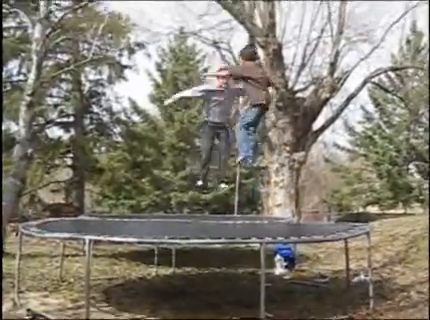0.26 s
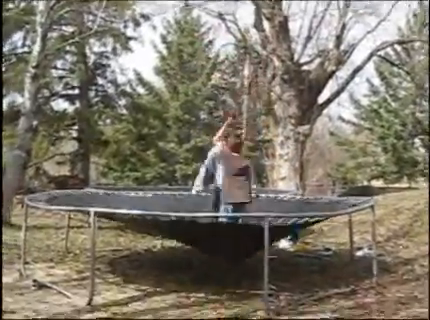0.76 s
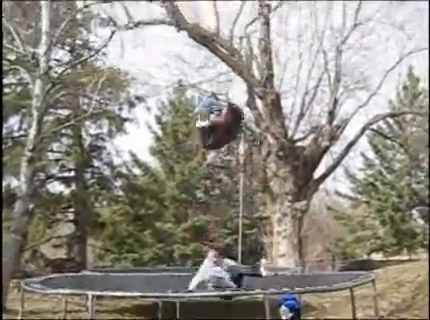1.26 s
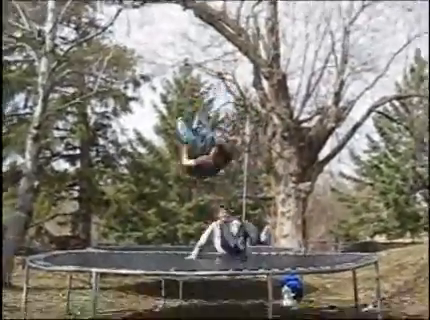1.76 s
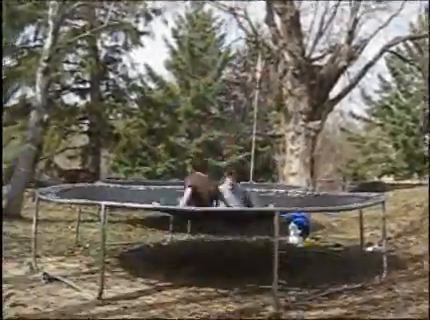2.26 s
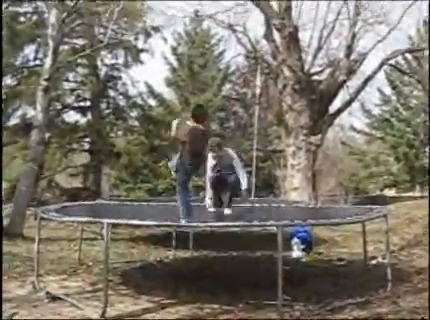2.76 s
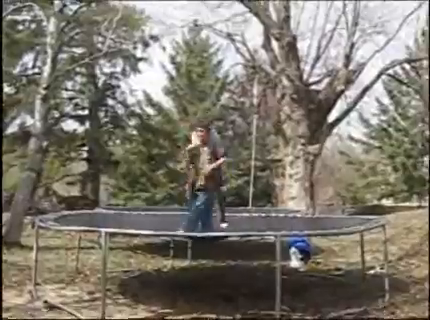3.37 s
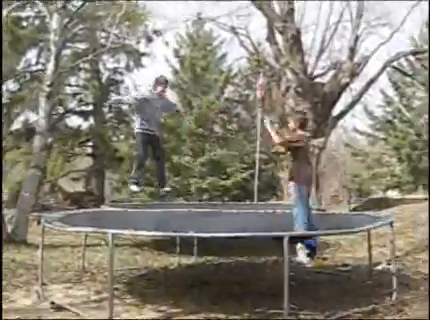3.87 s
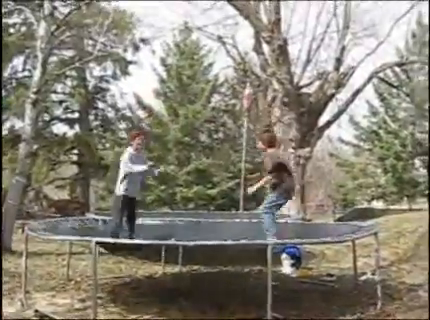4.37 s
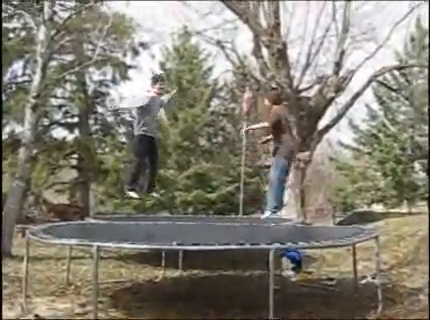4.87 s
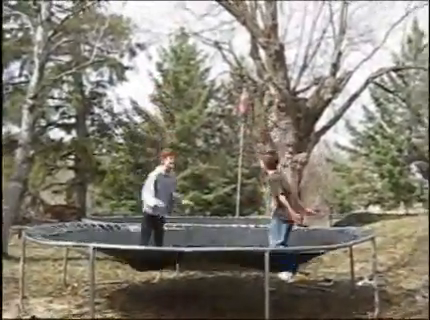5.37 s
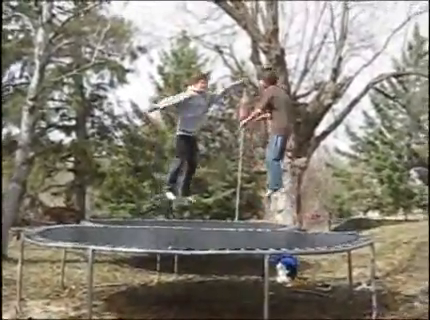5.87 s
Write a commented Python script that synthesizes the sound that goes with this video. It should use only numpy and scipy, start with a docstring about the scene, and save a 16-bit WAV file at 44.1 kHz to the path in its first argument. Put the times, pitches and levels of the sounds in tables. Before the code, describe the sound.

The steel springs of a garden trampoline rasp up front in a loose bouncing rhythm, each bright, scratchy stretch leaving a thin metallic ring. A short rasp opens, and a far bird gives one faint falling whistle at about 0.5 seconds. Longer rasps come at 0.7, 1.5 and 2.1 seconds, with soft thumps on the mat, small frame knocks and quick creaks between them; the clearest knocks fall near 1.1 and 2.1 seconds. Another brief rasp arrives at 3 seconds, then the sound drops out from about 3.2 to 3.9 seconds. It returns with a sharp tick and more rasping, with further bounces around 4.4 and 5.4 seconds. A few springs ping lightly near 6 seconds as the last rasp fades. Quiet outdoor air and the low hum of distant engines lie underneath, slightly heavier after the gap.

```python
"""Two on a garden trampoline

Each landing stretches the steel springs: their hooks stick and slip on the frame in a bright rasp,
and the coils ring on while the jumpers are in the air. Feet thump the rustling mat, far engines hum
and a bird whistles once. Midway the sound drops out for a moment."""
import sys
import numpy as np
from scipy import signal
from scipy.fft import rfft, irfft, next_fast_len
from scipy.io import wavfile
from scipy.ndimage import map_coordinates

SR = 44100
rng = np.random.default_rng(int(sys.argv[2]) if len(sys.argv) > 2 else 0)


def file_out(sig):
    """Save sig as 16-bit WAV at sys.argv[1]."""
    # one column per channel
    cols = np.atleast_2d(sig).T
    # limit, then scale
    lim = np.clip(cols, -1, 1)
    pcm = np.round(lim * 32767).astype(np.int16)
    wavfile.write(sys.argv[1], SR, pcm)


N = 270333
TIME = np.arange(N) / SR
DROPOUT_START_S, DROPOUT_END_S = 3.153, 3.853


def from_db(db):
    """Decibels to gain."""
    return 10 ** (np.asarray(db) / 20)


def rms_one(x):
    """Scale to rms 1."""
    return x / np.sqrt(np.mean(x ** 2) + 1e-20)


def drift(rate_hz):
    """Smooth random modulation that rolls off above rate_hz; rms about 1."""
    hop, run_in = 40, 2000
    pole = np.exp(-2 * np.pi * rate_hz * hop / SR)
    noise = rng.standard_normal(N // hop + run_in + 2)
    slow = signal.lfilter([1], [1, -2 * pole, pole * pole], noise)[run_in:]
    return np.interp(np.arange(N) / hop, np.arange(len(slow)), rms_one(slow))


def coloured(x, spectrum):
    """Shape a texture with an EQ curve (f/Hz, gain/dB), rolled off below its first point; rms 1."""
    hz, db = np.transpose(spectrum)
    size = next_fast_len(N)
    bin_hz = np.maximum(np.arange(size // 2 + 1) * SR / size, 1)
    gain = from_db(np.interp(np.log(bin_hz), np.log(hz), db))
    low_cut = np.minimum(bin_hz / hz[0], 1) ** 2
    return rms_one(irfft(rfft(x, size) * gain * low_cut, size)[:N])


def resonance(x, hz, width):
    """Two-pole band-pass with gain 1 at its peak; width in Hz."""
    radius = np.exp(-np.pi * width / SR)
    feedback = [1, -2 * radius * np.cos(2 * np.pi * hz / SR), radius ** 2]
    return signal.lfilter(np.array([1, 0, -1]) * (1 - radius ** 2) / 2, feedback, x)


def decay(start, t60):
    """Envelope that jumps to 1 and falls 60 dB in t60 seconds."""
    age = TIME - start
    return (age >= 0) * np.exp(-np.log(1000) * np.clip(age / t60, 0, 2))


def tone(path, waver, flutter_db):
    """A slightly unsteady sine gliding along a path (t/s, f/Hz, level/dB)."""
    times, pitches, levels = np.transpose(path)
    hz = np.interp(TIME, times, pitches) * (1 + waver * drift(27))
    db = np.interp(TIME, times, levels) + flutter_db * drift(11)
    sounding = (TIME >= times[0]) & (TIME <= times[-1])
    return np.sqrt(2) * np.sin(2 * np.pi * np.cumsum(hz) / SR) * from_db(db) * sounding


def open_air():
    """A bed of outdoor air and far traffic, heavier after the dropout."""
    # colour of the air before and after the dropout: f/Hz, relative level/dB
    early_eq = [(25, -10.5), (60, -3), (110, -1.5), (300, 0), (480, -1), (750, 3), (1050, -1.5),
                (1350, -0.5), (1700, -7.5), (3000, -10), (6000, -17.5), (15500, -19)]
    late_eq = [(25, -15), (85, -3.5), (150, -4.5), (270, -2), (340, 7), (450, -3.5), (750, -3),
               (1050, -3.5), (1350, -6.5), (1700, -8), (3000, -10.5), (6000, -21.5), (15500, -25)]
    early = from_db(-51.5) * coloured(rng.standard_normal(N), early_eq)
    late = from_db(-48) * coloured(rng.standard_normal(N), late_eq)
    return np.where(TIME < DROPOUT_END_S, early, late)


def engines():
    """Far engines hum as low, wavering tones."""
    # one path per drone: t/s, f/Hz, level/dB
    drones = [
        [(0.9, 230, -66), (1.2, 231, -62.5), (2.0, 232, -64.5), (2.7, 233, -57.5), (3.2, 232, -59)],
        [(3.85, 83, -63), (4.5, 84, -67), (4.8, 91, -57), (5.3, 92, -58.5), (5.7, 90, -71)],
        [(3.85, 132, -60.5), (4.5, 138, -63), (5.3, 142, -65.5), (5.7, 125, -65), (5.9, 123, -56),
         (6.13, 123, -53)],
    ]
    return sum(tone(path, waver=0.0047, flutter_db=2.5) for path in drones)


def bird():
    """A far bird gives one thin, falling whistle."""
    # path of the whistle: t/s, f/Hz, level/dB
    whistle = [(0.445, 3640, -65), (0.585, 3550, -67), (0.63, 3460, -69)]
    return tone(whistle, waver=0.003, flutter_db=3.0)


def mat(rub_db, rustle_db):
    """The woven mat rustles dully as it stretches, following the rub of the hooks."""
    weave = coloured(rng.standard_normal(N), [(70, -5), (600, -7), (2000, -22.0)])
    return from_db(rub_db + rustle_db) * weave


def knocks(scuff_db, contact_s):
    """Each knock is one damped swing with a dull scuff; the soft contact rounds its attack."""
    # bodies hitting the mat, and knocks of the frame: t/s, level/dB, f/Hz, t60/s
    hits = [(0.06, -47, 488, 0.35), (0.784, -42, 85, 0.13), (1.133, -30, 628, 0.063),
            (2.063, -28, 120, 0.057), (2.061, -31.5, 750, 0.02), (2.097, -29.5, 726, 0.06),
            (2.118, -44, 165, 0.3), (2.15, -49, 80, 0.48), (2.351, -34, 1375, 0.12),
            (2.599, -39.5, 196, 0.057), (2.72, -37.5, 1633, 0.13), (3.132, -36.5, 576, 0.12),
            (3.146, -39, 1380, 0.068), (3.896, -26.5, 1030, 0.013), (4.335, -42.5, 747, 0.37)]
    out, noise = np.zeros(N), rng.standard_normal(N)
    for start, db, hz, t60 in hits:
        swing = np.sin(2 * np.pi * hz * (TIME - start))
        scuff = from_db(scuff_db) * rms_one(resonance(noise, hz, hz / 2))
        attack = np.clip((TIME - start) / contact_s, 0, 1)
        out += from_db(db) * attack * decay(start, t60) * (swing + scuff)
    return out


def twangs(t60):
    """Single springs ring out as the load leaves them."""
    # springs going slack: t/s, f/Hz, peak level/dB
    releases = [(0.199, 4520, -48), (5.955, 4830, -46), (5.975, 3250, -44.5), (6.044, 3735, -50.5)]
    return sum(from_db(db) * decay(start, t60) * np.sin(2 * np.pi * hz * (TIME - start))
               for start, hz, db in releases)


def overtones(low_hz, high_hz, length_s, count=2300):
    """The rubbing hooks set spring after spring singing, each at a high mode of its own; rms 1."""
    out = np.zeros(N + SR)
    age = np.arange(int(length_s * SR)) / SR
    swell = np.sin(np.pi * np.sqrt(age / length_s)) ** 2
    for when, pitch, size in rng.random((count, 3)):
        start = int(when * N)
        hz = low_hz * (high_hz / low_hz) ** pitch
        out[start:start + len(age)] += size * np.sqrt(hz) * swell * np.sin(2 * np.pi * hz * age)
    return rms_one(out[:N])


def coils(force, t60, main_hz, damping_hz):
    """Four groups of coils ring on after the rasp, longest near main_hz, and waver apart."""
    # coil modes: f/Hz, relative level/dB
    modes = [(1915, -12), (2090, -12), (2310, -10), (2985, -8.5), (3057, -2.5), (3092, -3.5), (3125, -0.5),
             (3215, -4), (3252, -1), (3344, -3.5), (3416, -4), (3468, -1.5), (3725, 0.5), (3790, -3.5),
             (4105, -0.5), (4328, -2.5), (4530, -2.5), (4640, -4.5), (5006, -4.5), (5200, -5)]
    groups, sway_s = 4, 0.00005
    out = np.zeros(N)
    for group in range(groups):
        ringing, shaking = np.zeros(N), force * rng.standard_normal(N)
        for hz, db in modes[group::groups]:
            width = np.log(1000) / (np.pi * t60) * (1 + abs(hz - main_hz) / damping_hz)
            ringing += from_db(db) * resonance(shaking, hz, width) * np.sqrt(SR / (np.pi * width))
        swayed_time = TIME + sway_s * drift(7)  # changing tension makes the ring waver
        out += map_coordinates(ringing, [swayed_time * SR], order=3)
    return out


def frame_tubes(friction):
    """The frame tubes give the friction a hollow midrange body; rms 1."""
    # tube resonances: f/Hz, width/Hz, relative level/dB
    modes = [(788, 290, -2), (1224, 130, -3.5), (1354, 231, 4.5), (1881, 228, 3), (2098, 269, 4),
             (2318, 300, -1.5)]
    return rms_one(sum(from_db(db) * resonance(resonance(friction, hz, width), hz, 2 * width)
                       for hz, width, db in modes))


def hook_snaps():
    """Envelope of the sharp jolts as hooks jump in their seats."""
    # jolts: t/s, relative level/dB, t60/s
    jolts = [(0.212, -32, 0.05), (0.645, -50, 0.05), (2.075, -39, 0.05), (2.602, -23, 0.055),
             (3.096, -24.5, 0.017), (3.144, -33, 0.07), (3.855, -23, 0.044), (3.937, -25.5, 0.047),
             (4.724, -25, 0.061), (6.043, -46.5, 0.11)]
    return sum(from_db(db) * decay(start, t60) for start, db, t60 in jolts)


def hook_slips(slips_per_s, uneven_db, wander_db, tick_s, hooks):
    """Hooks stick and slip, each at its own wandering rate and with its own short tick; rms 1."""
    out, age = np.zeros(N), np.arange(512) / SR
    for _ in range(hooks):
        slip_count = np.cumsum(slips_per_s * from_db(3 * drift(18))) / SR
        strength = from_db(uneven_db * rng.standard_normal(N) + wander_db * drift(12))
        clicks = np.diff(np.floor(slip_count), prepend=0) * strength
        tick = rms_one(rng.standard_normal(len(age)) * np.exp(-age / tick_s))
        out += signal.oaconvolve(clicks, tick)[:N]
    return rms_one(out)


def rubbing_levels():
    """Envelopes in dB for the hooks' rub, its scratch and what reaches the frame; loads add in power."""
    # a jumper loads the mat and the hooks rub until the springs are slack again:
    # fully loaded t/s, contact/s, level/dB, rise/s, release/s, sharpness/dB, frame share/dB
    bounces = [(0.0, 0.049, -26, 0.04, 0.14, -6.5, -5.5), (0.709, 0.6, -30.0, 0.031, 0.182, -1.2, -7),
               (1.452, 0.18, -31.5, 0.25, 1, -2.5, -6), (2.096, 0.44, -30, 0.042, 0.603, -1.1, -7),
               (3.055, 0.023, -33, 0.15, 0.24, -1, -8), (3.855, 0.32, -34.5, 0.02, 0.264, -5.5, -9),
               (4.36, 0.053, -26, 0.065, 0.26, -2, -10.5), (4.518, 0.34, -28.5, 0.1, 0.248, -4, -9.5),
               (5.359, 0.35, -29, 0.03, 0.5, -1, -9)]
    # short tugs as the mat swings back or a jumper shifts weight:
    # middle t/s, half length/s, level/dB, sharpness/dB, frame share/dB
    tugs = [(0.144, 0.028, -34.5, -6, -6), (0.22, .019, -40.5, -3.5, -5), (0.291, 0.025, -48.5, -3.5, -10),
            (0.76, 0.02, -30, 0, -5), (0.99, 0.026, -34, 2, -9), (1.08, 0.01, -30, -7, -3),
            (1.141, 0.0078, -27.5, -7.4, -6), (1.192, .022, -45.5, -15, 8.5), (1.282, 0.023, -42, -1, -2),
            (1.45, 0.066, -29, -3.5, -7.5), (1.585, 0.0073, -30, -6, -2.5), (1.655, .042, -43, 8, -15),
            (1.855, 0.024, -37.5, -4.5, -3.5), (1.947, 0.023, -40, -3, -3.5), (2.342, .012, -29, -4, -9),
            (2.627, 0.013, -45, 3, -4), (2.732, 0.022, -33.5, -0.5, -3.5), (2.786, 0.019, -37, -3.5, -2),
            (2.905, .012, -41.5, -5, -8), (2.939, .009, -40.5, -4, -9), (3.153, 0.018, -30, -4, -6.5),
            (3.868, 0.012, -25.5, -5, -12.5), (3.971, 0.028, -32.5, -2.5, -9.5),
            (4.117, 0.023, -40, -3, -3), (4.226, 0.01, -45.5, 1, -10), (4.566, 0.03, -29, -5, -10),
            (4.938, 0.043, -37, -6.5, -8.5), (5.1, .012, -50.5, -16, -5), (5.388, 0.023, -30.5, -6.5, -8),
            (5.604, 0.046, -36, -2, -6.5), (5.75, 0.019, -37.6, 5, -2), (5.818, 0.011, -34, -6, -7),
            (5.96, 0.018, -43, -1.5, -7)]
    fade_db, rise_curve = 40, 1.96  # the rise is steep at first and rounds off
    turn_at, turn_width, turn_dip_db = 0.43, 0.07, 1.2  # place and width as shares of the contact
    bite_s, bite_db, dulling_db_per_s = 0.039, 3, 8
    power = np.full((3, N), 1e-12)
    for landing, contact_s, db, rise_s, release_s, sharp_db, frame_db in bounces:
        age = TIME - landing
        rise = (np.maximum(-age, 0) / rise_s) ** rise_curve
        release = np.maximum(age - contact_s, 0) / release_s
        envelope_db = -fade_db * (rise + release)
        near = envelope_db > -2 * fade_db
        age = age[near]
        # the springs slow at the bottom of the bounce
        dip_db = turn_dip_db / (1 + ((age / contact_s - turn_at) / turn_width) ** 4)
        slack_db = envelope_db[near] - dip_db
        rub_db = db + slack_db
        # the scratch bites as tension builds and dulls as the springs let go
        scratch_db = sharp_db - bite_db * np.exp(-np.maximum(age, 0) / bite_s) - dulling_db_per_s * age
        tube_db = frame_db - 0.06 * slack_db  # the frame fades last
        power[:, near] += from_db([rub_db, rub_db + scratch_db, rub_db + tube_db]) ** 2
    for middle, half_s, db, sharp_db, frame_db in tugs:
        near = np.abs(TIME - middle) < 4 * half_s
        swell = np.exp(-((TIME[near] - middle) / half_s) ** 2)
        peak_power = from_db(db + np.array([0, sharp_db, frame_db])) ** 2
        power[:, near] += np.outer(peak_power, swell)
    return 10 * np.log10(power)


def springs(rub_db, scratch_db, frame_db):
    """Hook friction is heard directly, through the frame tubes and through the coils."""
    # bright rasp above the frame resonances: f/Hz, relative level/dB
    rasp_eq = [(1200, -37), (2500, -10), (2950, 2), (3450, 0.5), (3900, -0.5), (4500, -0.5), (5700, -3.5),
               (6100, -5.5), (7200, -14.5), (9000, -29), (12000, -53.5)]
    # fine scratch of sharp slips: f/Hz, relative level/dB
    scratch_eq = [(4500, -30), (7000, -12), (9000, -0.5), (10300, -4), (12500, -6), (15500, -8)]
    direct_gain_db, frame_gain_db, coil_gain_db = 1.0, -0.85, -16.0
    singing_db, judder_db, snap_db = -10.5, 1.29, -2
    rubbing = hook_slips(slips_per_s=260, uneven_db=2.2, wander_db=1.5, tick_s=0.0013, hooks=13)
    singing = from_db(singing_db) * overtones(low_hz=2000, high_hz=11990, length_s=0.085)
    friction = (rubbing + singing) * from_db(judder_db * drift(49))
    snaps = from_db(snap_db) * hook_snaps()
    force = np.hypot(from_db(rub_db), snaps)
    rasp = force * coloured(friction, rasp_eq)
    scratch = np.hypot(from_db(scratch_db), snaps) * coloured(friction, scratch_eq)
    body = from_db(frame_gain_db + frame_db) * frame_tubes(friction)
    ring = from_db(coil_gain_db) * coils(force, t60=1.0, main_hz=3100, damping_hz=170)
    return from_db(direct_gain_db) * (rasp + scratch) + body + ring


def scene():
    """The trampoline up front and the garden behind it, the same in both channels."""
    rub_db, scratch_db, frame_db = rubbing_levels()
    steel = springs(rub_db, scratch_db, frame_db) + twangs(t60=0.4)
    trampoline = steel + mat(rub_db, rustle_db=-33.0) + knocks(scuff_db=-3.5, contact_s=0.00089)
    mono = trampoline + open_air() + engines() + bird()
    return np.array([mono, mono])


def record(dry):
    """The recorder notches the treble deeply, falls silent for a moment and cuts the top."""
    dipped = dry - resonance(dry, hz=7860, width=1350)
    notched = dipped - resonance(dipped, hz=7880, width=440)
    live = (TIME < DROPOUT_START_S) | (TIME > DROPOUT_END_S)
    gate = np.where(live, 1, from_db(-12.0) * decay(DROPOUT_START_S, t60=0.07))  # ducks, then dies away
    cutoff_hz = 15500
    high_cut = signal.ellip(12, 0.1, 80, cutoff_hz, fs=SR, output="sos")
    return signal.sosfilt(high_cut, notched * gate)


dry = scene()
out = record(dry)
file_out(out)
```